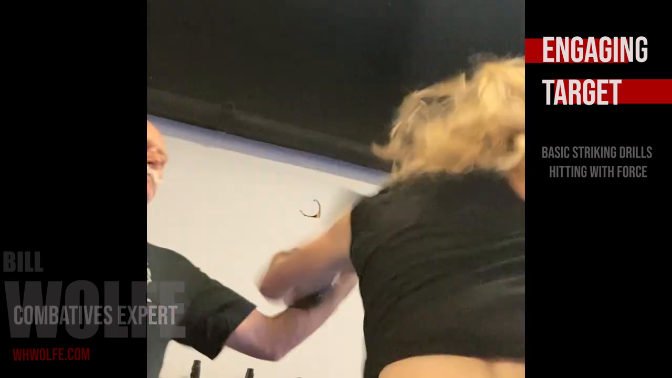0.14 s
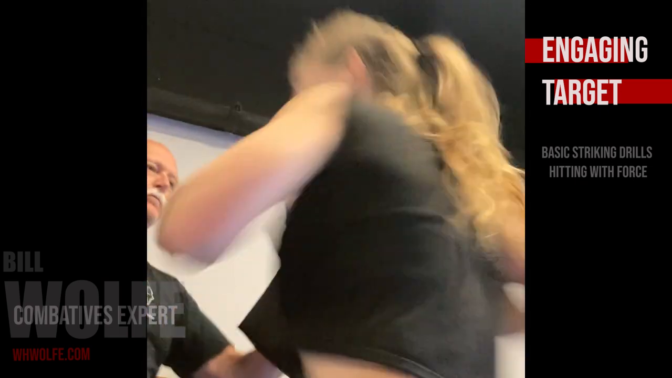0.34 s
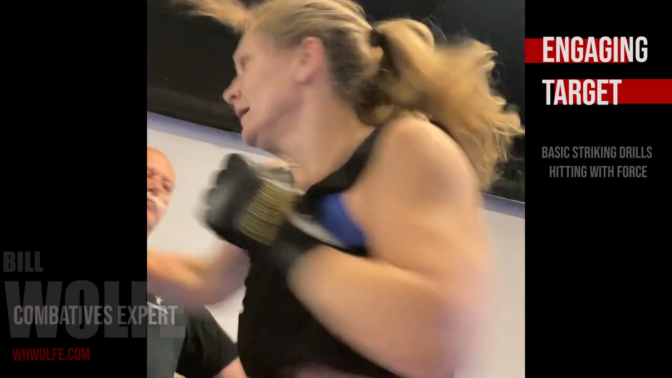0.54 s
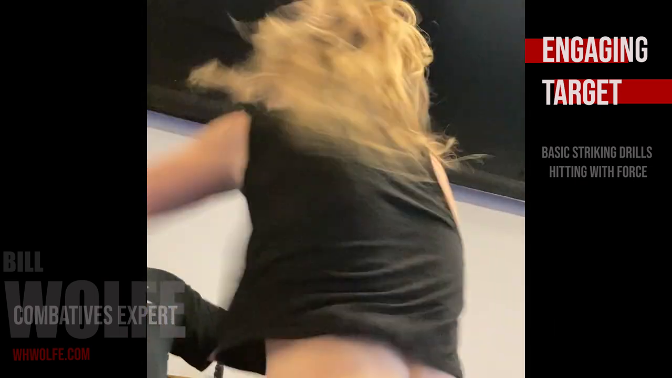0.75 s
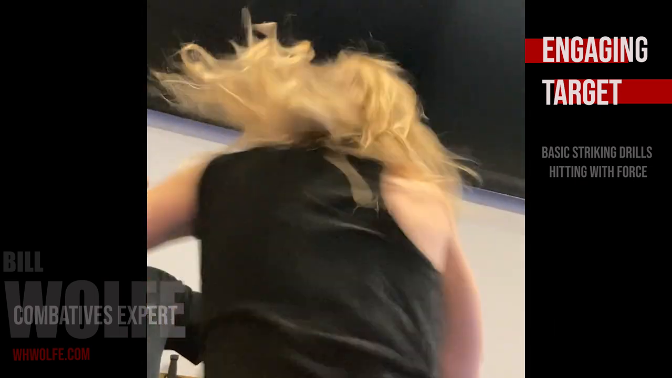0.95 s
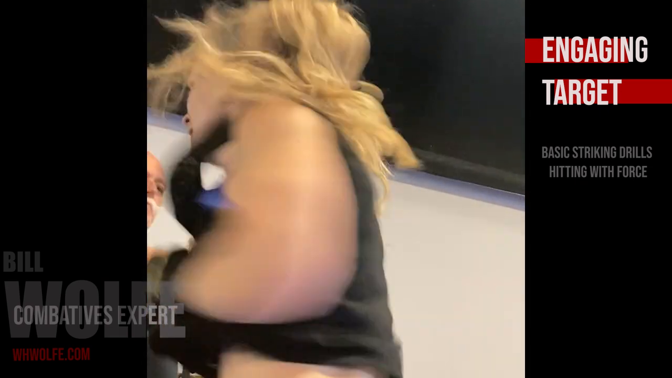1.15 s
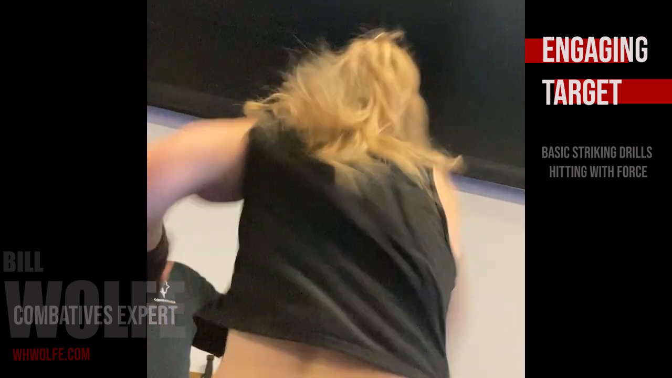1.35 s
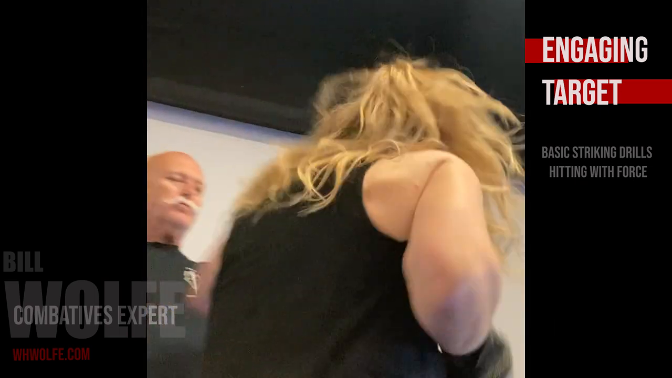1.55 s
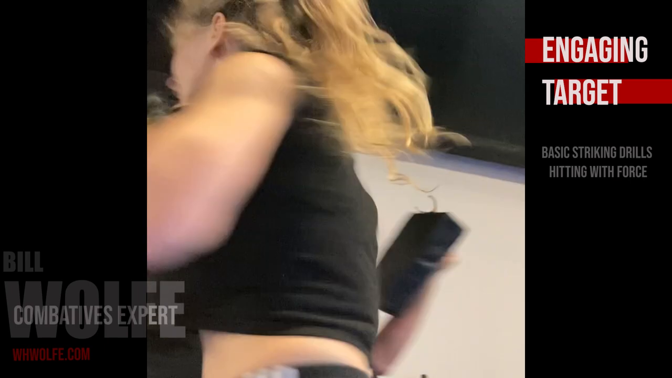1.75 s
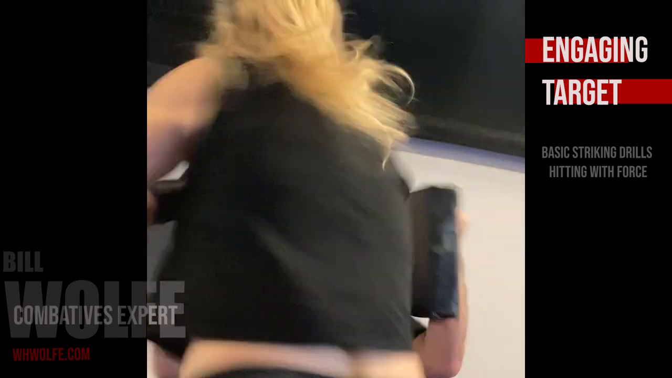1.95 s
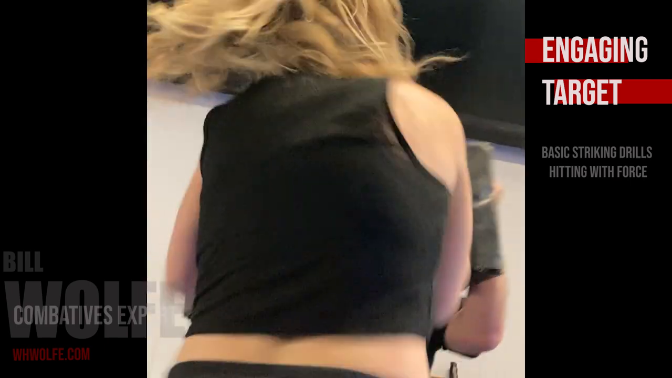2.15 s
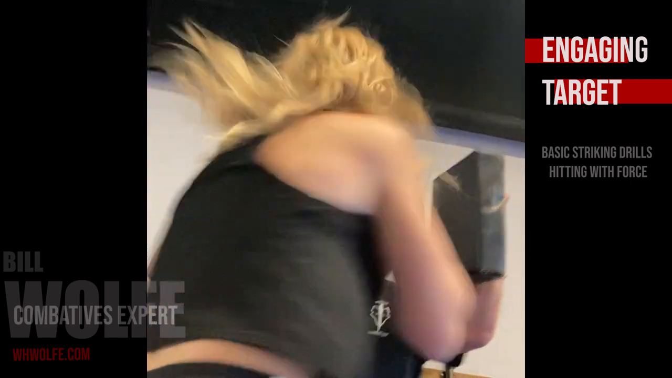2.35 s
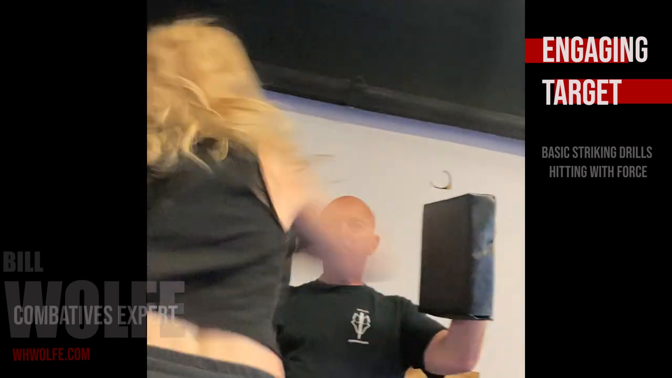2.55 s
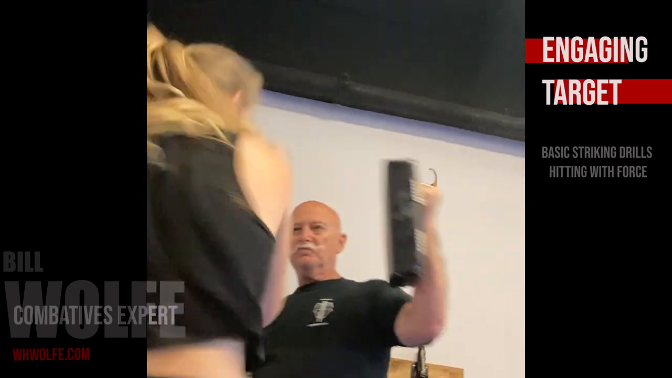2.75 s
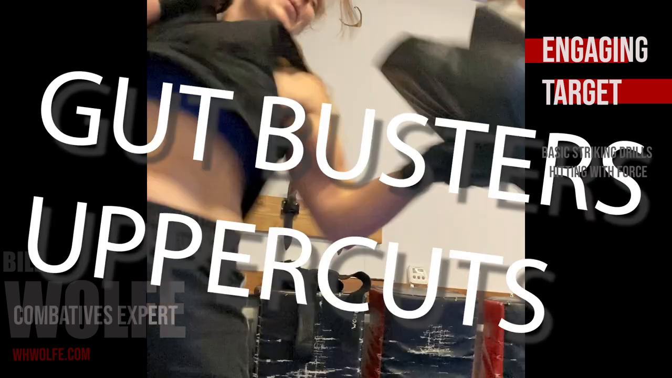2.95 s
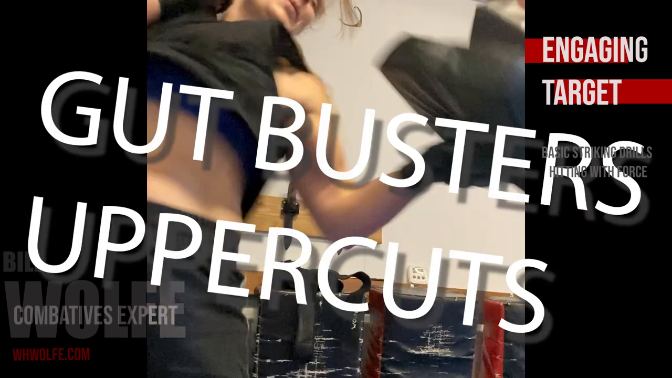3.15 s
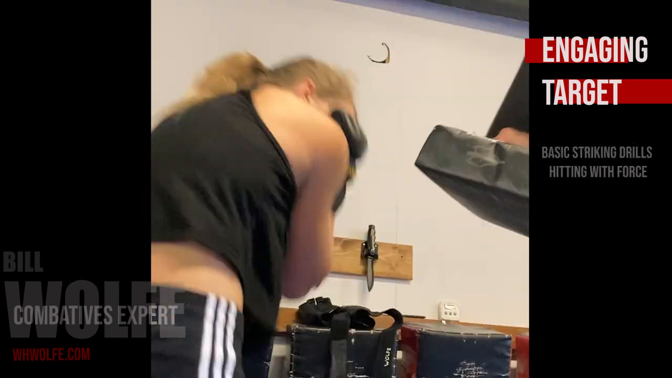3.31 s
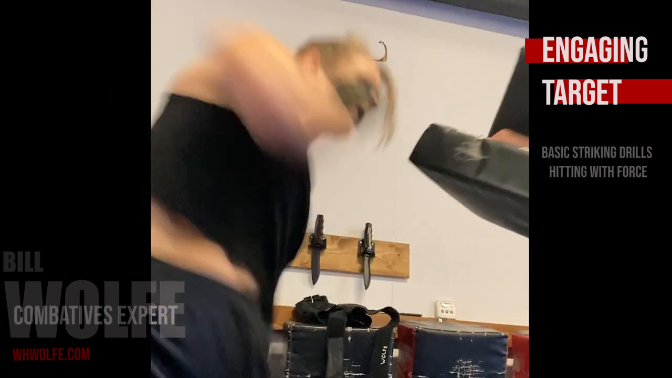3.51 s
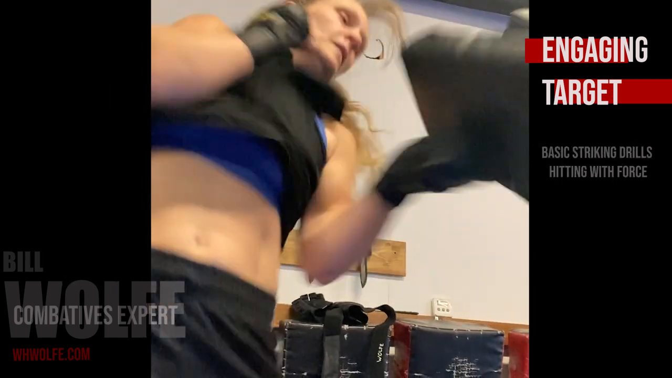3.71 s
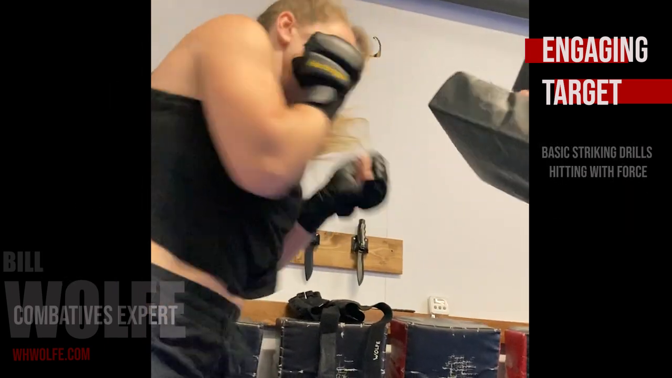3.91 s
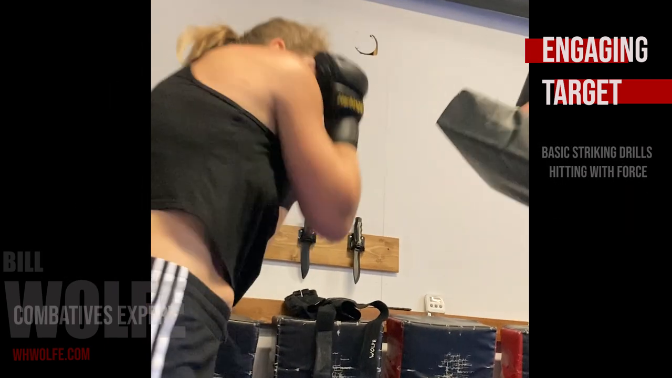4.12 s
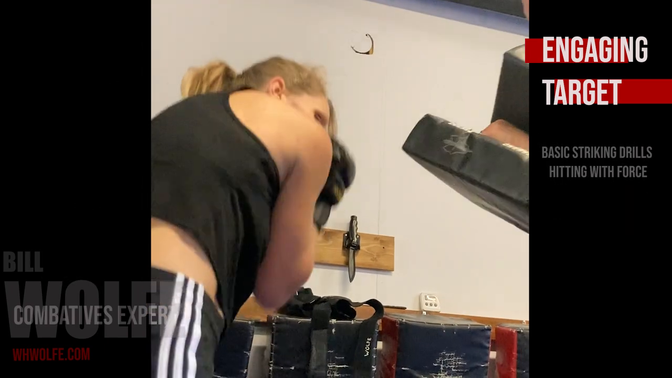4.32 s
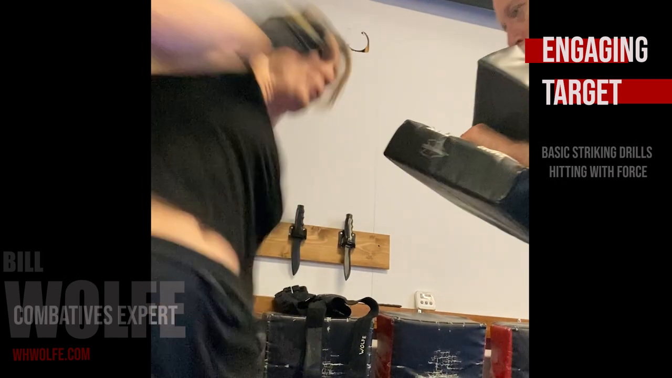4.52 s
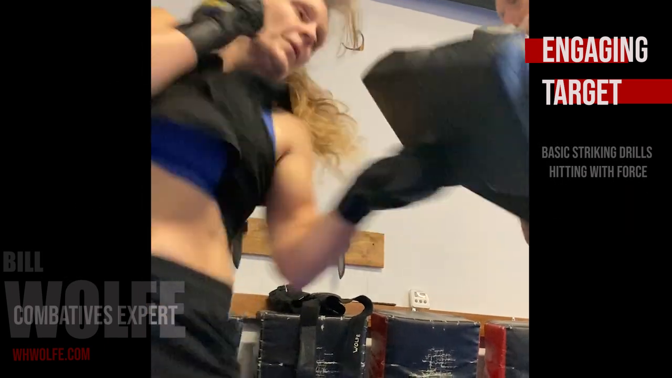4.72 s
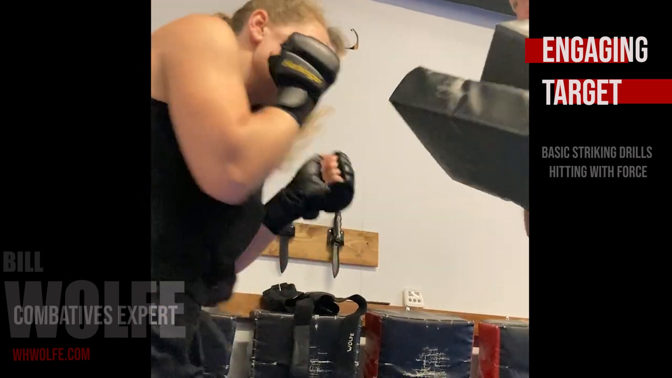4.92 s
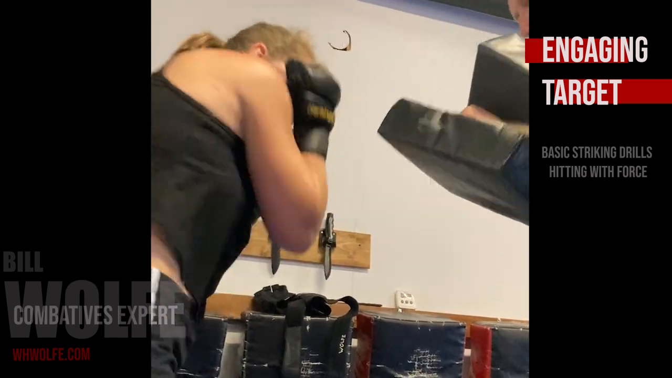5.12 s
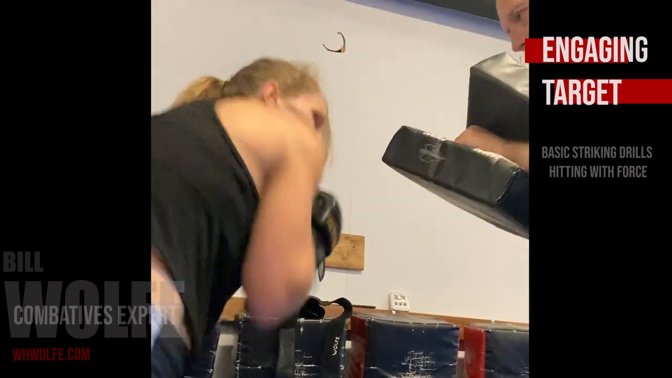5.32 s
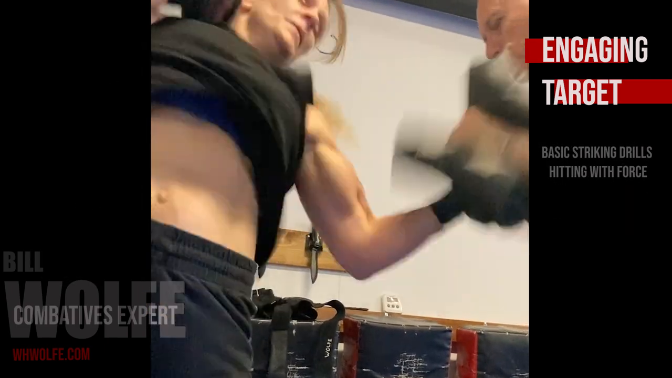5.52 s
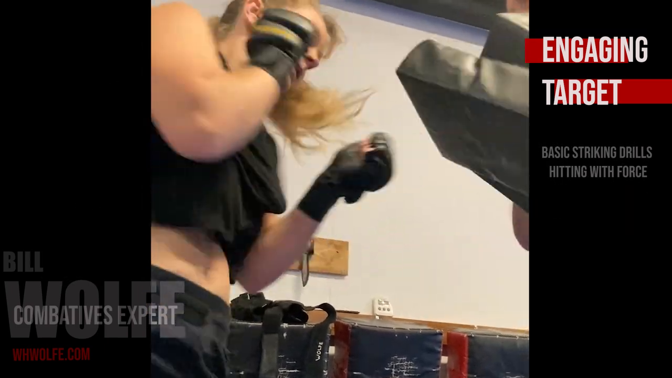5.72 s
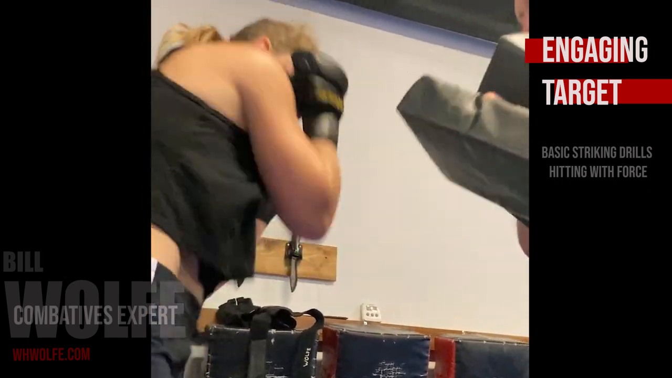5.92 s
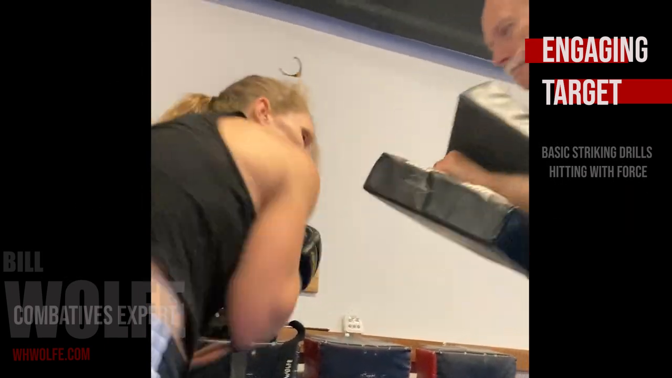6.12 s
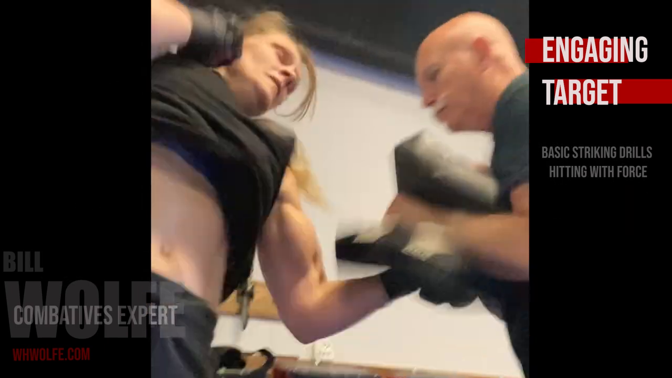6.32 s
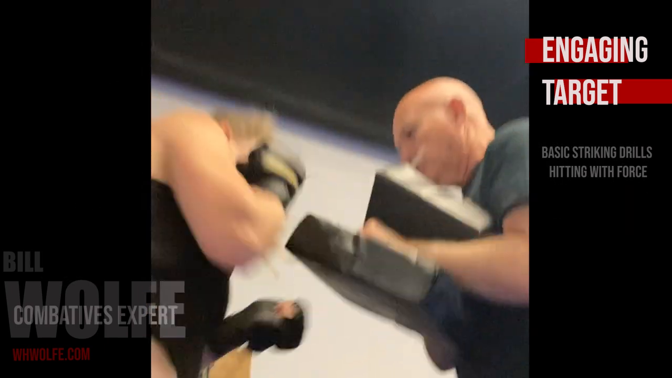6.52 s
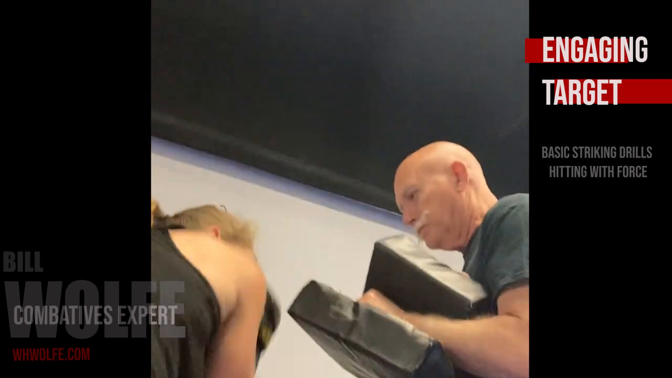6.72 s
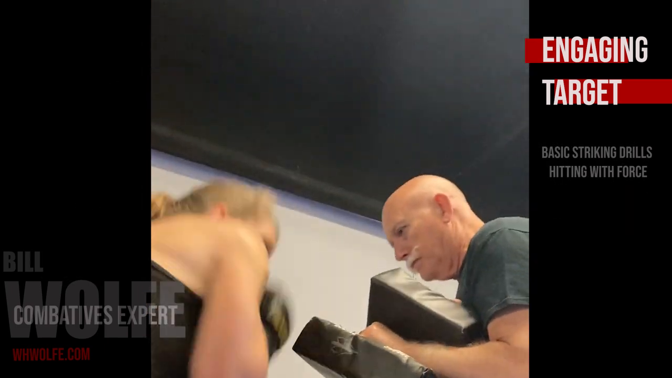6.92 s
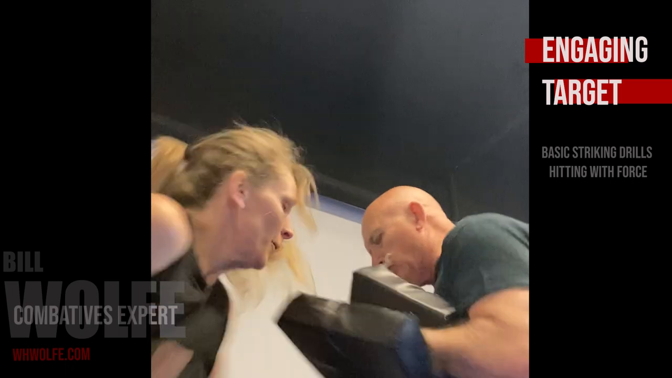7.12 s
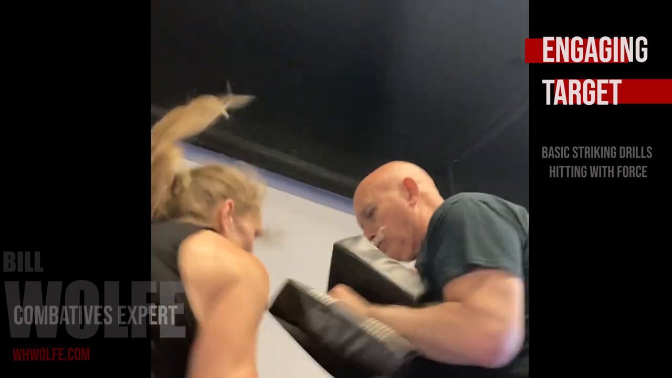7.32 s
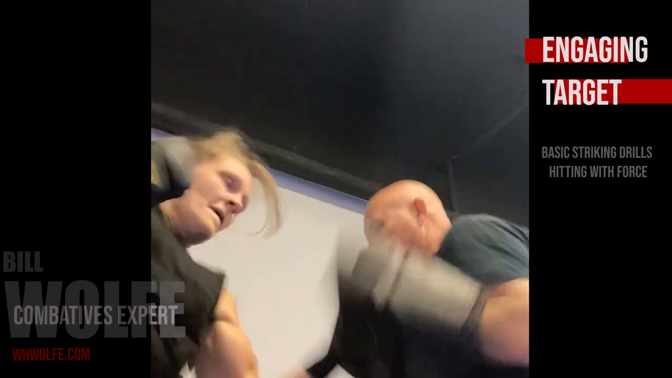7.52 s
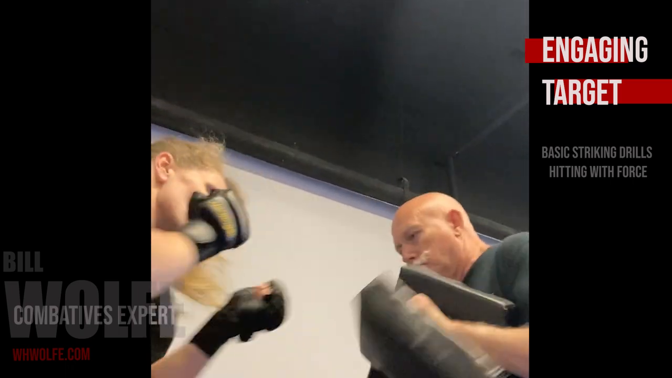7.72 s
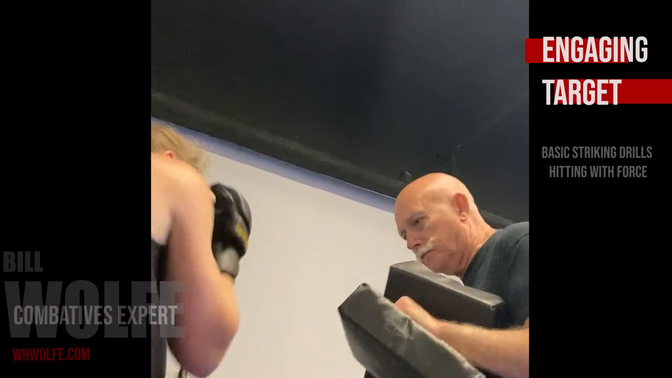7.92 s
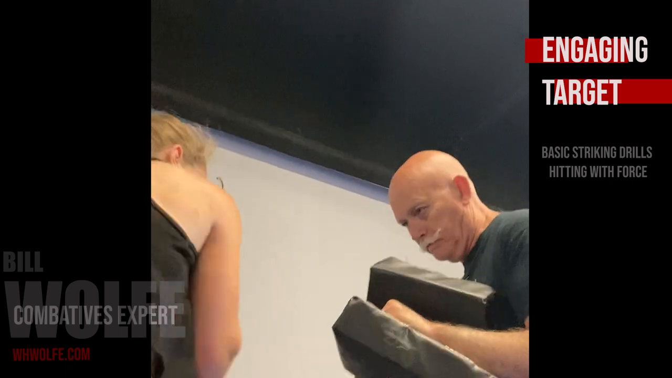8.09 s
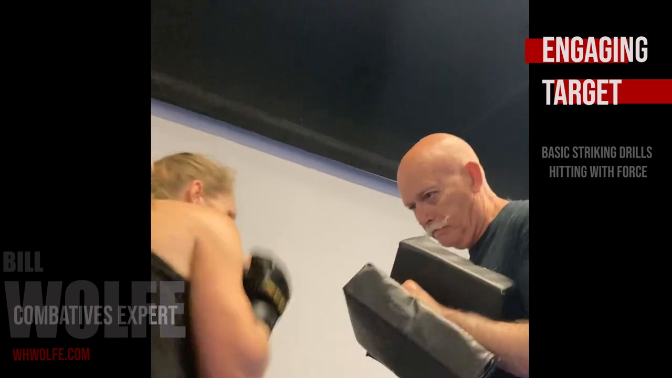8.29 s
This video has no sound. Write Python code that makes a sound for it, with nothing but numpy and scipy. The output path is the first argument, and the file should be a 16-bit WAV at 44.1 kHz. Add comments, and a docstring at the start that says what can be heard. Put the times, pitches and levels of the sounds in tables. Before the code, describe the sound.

A close stereo pickup in a reverberant gym with a faint low room murmur. At 0 s the ring of a punch just landed is still decaying; a light tap follows, then a small sharp smack at 0.1. From 0.45 to 2.6 s gloved fists pound handheld vinyl pads roughly every quarter to third of a second: noisy slap, falling hollow pop, short foam thump. Hits near 0.45, 1.1 and 1.75 are strongest; others are duller. Soft foot taps and hissing clothing fill gaps. At about 2.9 the sound cuts dead until 3.37, when quiet room tone returns. Heavy, crackling single uppercuts land at 3.6, 4.6, 5.5 and 6.3, with cloth swishes and tiny taps between. A quicker group hits at 7.05, a softer 7.25 and a strong 7.5. The hall ring fades over about a second, leaving faint rustle and tiny taps near 8.2.

```python
"""The ring of a punch just landed opens the scene; a light tap follows, then a fast flurry of gloved punches
into handheld vinyl pads in a gym, a brief silence, and single uppercuts.
Each punch sums a noisy vinyl slap, gliding pops of air trapped under the glove, and a low thump of the foam.
Taps are short noise bursts and clothes a swelling hiss; decaying noise makes the hall ring for about a second."""
import sys
import numpy as np
from scipy import signal
from scipy.fft import rfft, irfft, next_fast_len
from scipy.io import wavfile
from scipy.ndimage import uniform_filter1d

SR = 44100
rng = np.random.default_rng(int(sys.argv[2]) if len(sys.argv) > 2 else 0)


def unload_audio(sound):
    """Save the sound as a 16-bit wav file, at the path given as the first command line argument."""
    columns = np.transpose(np.atleast_2d(sound))
    # keep every value between -1 and 1, then stretch to whole-number steps
    steps = np.round(np.clip(columns, -1, 1) * 32767)
    wavfile.write(sys.argv[1], SR, steps.astype(np.int16))


N = 368235

# Levels of events are relative: each function trims them by a constant.
# Punches, the first before the start so that only its ring is heard: touch_s, full_contact_s (after touch),
# pop_pitch_hz, pop_half_length_s, pop_db, thump_db, slap_db, crackle_db, slap_length_s, smack_pitch_hz, smack_db
PUNCH_EVENTS = [(-.2, .006, 324, .005, -2.5, -11.5, -26.5, -30.5, 0.016, 1500, -18),
                (0.1249, 0.0019, 800, 0.001, -3, -20.5, -28.5, -37, 0.0037, 960, -14),
                (.453, .0055, 306, 0.003, 0, -14.5, -28, -34.5, 0.011, 1620, -22),
                (.7014, .0077, 298, 0.0057, -15, -22, -31.5, -35.5, 0.028, 1870, -23),
                (0.9673, .006, 370, 0.0072, -16.5, -24, -47.5, -44, 0.0051, 1770, -17.5),
                (1.122, 0.0065, 438, 0.0029, -1, -15.5, -25.5, -35.5, 0.0091, 1070, -10.5),
                (1.4419, .005, 347, 0.0058, -6.5, -18.5, -33.5, -44.5, 0.041, 1880, -22),
                (1.759, .0054, 372, .0015, 1, -12, -28.5, -34.5, 0.012, 2340, -11),
                (2.0267, .0097, 306, .0044, -9, -20, -37.5, -49, 0.04, 1950, -24),
                (2.339, .0099, 306, 0.0061, -13.5, -21, -39.5, -49.5, 0.021, 1720, -28),
                (2.5645, .006, 288, .0047, -6.5, -13, -33.5, -37, 0.023, 1700, -18),
                (3.6199, 0.00725, 284, .003, -2.5, -10.5, -29.5, -31, 0.0097, 1218, -11),
                (4.6117, 0.00862, 366, 0.0083, -4, -9, -27, -31.5, 0.014, 2070, -9),
                (5.514, 0.00792, 373, 0.0098, -5.5, -10, -25.5, -31.5, 0.0082, 910, -5),
                (6.322, 0.0071, 320, .0053, -2.5, -11.5, -27.5, -31.5, 0.01, 790, -5.5),
                (7.064, 0.00548, 466, 0.0036, -4, -14, -27.5, -39, 0.0075, 1750, -6.5),
                (7.251, 0.00516, 427, 0.0061, -6.5, -18, -35.5, -36, 0.0098, 850, -21),
                (7.5008, 0.00867, 375, 0.0038, -2, -13, -29, -31.5, 0.0071, 1540, -10)]
# Light steps and glove touches: start_s, thud_db, tick_db, tick_length_s, tick_pitch_hz
TAP_EVENTS = [(0.0617, -32, -28, 0.013, 4300), (0.2485, -22, -33, 0.0082, 4650),
              (.697, -19, -29.5, 0.0061, 1886), (0.91, -24.5, -49, 0.0079, 1500),
              (1.008, -25.5, -42.5, .006, 1610), (2.082, -19, -30, 0.012, 4900),
              (2.126, -20, -25.5, 0.0042, 2330), (3.386, -45.5, -51.5, 0.0026, 800),
              (4.315, -31.5, -43, 0.0034, 2950), (5.224, -30.5, -28.5, 0.0017, 2725),
              (5.287, -36, -54, 0.0091, 500), (6.057, -25, -32.5, 0.0043, 4160),
              (6.761, -26, -39, 0.0082, 2170), (7.243, -27, -25.5, 0.0054, 2880),
              (8.194, -34.5, -40.5, 0.0051, 2560), (8.227, -46, -44, .002, 6950)]
# Turns of the body: fastest_s, half_length_s, level_db
BODY_TURNS = [(1.71, 0.045, -43), (2.11, .03, -37), (2.29, .015, -40), (2.44, 0.085, -39.5),
              (2.86, .03, -43), (4.155, .025, -40), (4.52, 0.1, -35), (5.16, .05, -51.5),
              (6.09, 0.048, -40.5), (6.95, 0.085, -35), (7.18, 0.065, -34), (7.7, .04, -40.5),
              (8.04, 0.027, -54)]
# Clothes dragged by each punch, in swing and recoil: offset_s (from touch), half_length_s, level_db (against thump)
ARM_MOVES = [(-.02, 0.044, -36.5), (0.137, .15, -35.5)]

# Spectrum of the vinyl slap: frequency_hz, relative_level_db
SLAP_SPECTRUM = [(200, -9), (550, 8), (800, -3), (1150, -1.5), (1600, 3.5), (2600, -4), (4000, -6),
                 (6000, -7.5), (10000, -20), (16000, -38)]
# Spectrum of the creasing skin: frequency_hz, relative_level_db
CRACKLE_SPECTRUM = [(1500, -7), (4000, 5), (6000, 5.5), (8500, 5), (11000, -2.5), (15000, -2),
                    (17000, -9.5)]
# Spectrum of knocks into the padding: frequency_hz, relative_level_db
KNOCK_SPECTRUM = [(60, -36), (170, -3), (270, 0.5), (480, 1), (620, -5), (780, -3), (1200, -13),
                  (3000, -45.5), (8000, -67)]
# Spectrum of a tap's dull thud: frequency_hz, relative_level_db
THUD_SPECTRUM = [(50, 0.5), (120, -3), (200, -2), (310, 1), (500, -9), (900, -36), (3000, -27), (8000, -62)]
# Spectrum of sliding fabric: frequency_hz, relative_level_db
CLOTH_SPECTRUM = [(100, -33.5), (500, -3.5), (1700, -3.5), (3200, -4), (5500, -3.5), (8500, -3),
                  (11000, -13), (15000, -7)]
# Spectrum of the room's murmur: frequency_hz, relative_level_db
AIR_SPECTRUM = [(15, -30.5), (25, -14), (92, -0.5), (373, -13), (545, -16), (734, -14), (1290, -24.5),
                (1650, -17.5), (2410, -26.5), (9570, -33.5), (11900, -42.5), (16000, -33.5)]

# Echoes off floor, bodies and near walls: delay_s (before random variation), level_db
EARLY_ECHOES = [(.0062, -20), (.0095, -16), (0.0172, -22.5), (0.033, -36), (.044, -27.5)]
# Hall reverberation: frequency_hz, energy_db (against the direct sound), t60_s
HALL_BANDS = [(41.2, -7.5, 0.25), (62.5, 4.5, .6), (83.5, 2, 0.49), (121, -3.5, 0.72), (170, -1.5, 0.97),
              (338, -9, 0.59), (560, -3.5, 0.77), (1000, -0.5, 1.25), (2125, -2.5, 1.55),
              (4240, -4.5, 1.08), (8750, -9, 0.66), (15000, -5.5, 0.18)]
# Share of the hall's sound common to both ports: frequency_hz, share (0-1)
SHARED_POWER = [(60, 0.98), (250, 1), (550, 0.88), (1100, 0.73), (2500, 0.2), (4500, 0.7), (8000, 0.8)]
# Microphone response, with a dip near 12 kHz: frequency_hz, level_db
MIC_RESPONSE = [(20, -1), (50, 0.5), (10000, 1), (11100, -6.5), (11900, -37), (12900, -3), (14000, -0.5),
                (15700, -4), (16300, -3.5)]

LEAD = 0.03  # s of rushing air rendered before the touch
POP_GLIDE = 1.65  # exponent: steepness of the pop's fall in pitch
# a heavier blow crackles brighter: treble gain at a medium thump (dB), and its rise per dB of thump
MEDIUM_THUMP_DB, TREBLE_DB, TREBLE_PER_DB = -14, 4, 0.74
RUSTLE_DB = -63.5  # the clothes are never quite still; relative, like the moves
AIR_DB = -51  # rms over both ports, before the microphone
EDGE_HZ = 16600  # upper band limit


def amp(db):
    """Logarithmic level: 20 dB is a tenfold amplitude."""
    return 10 ** (np.asarray(db) / 20)


def evened(x):
    """Normalisation of mean power: scales to rms 1."""
    return x / np.sqrt(np.mean(x ** 2) + 1e-20)


def read(points, hz):
    """Interpolation on a logarithmic frequency axis."""
    f, value = np.transpose(points)
    return np.interp(np.log(hz + 1), np.log(f + 1), value)


def colour(x, points):
    """Linear filtering: multiplies the spectrum by a gain curve in dB."""
    size = next_fast_len(x.shape[-1])
    gain = amp(read(points, np.fft.rfftfreq(size, 1 / SR)))
    return irfft(rfft(x, size) * gain, size)[..., :x.shape[-1]]


def add(mix, s, sound):
    """Superposition: adds a sound to the mix at time s."""
    part = mix[:, max(round(s * SR), 0):][:, :sound.shape[-1]]
    part += sound[..., :part.shape[-1]]


def grains(size, spectrum, spread_db):
    """Granular contact noise: many tiny snaps of unequal size, filtered, at rms 1."""
    snap_db = spread_db * np.minimum(rng.exponential(1, size), 4)
    snaps = rng.standard_normal(size) * amp(snap_db)
    return evened(colour(snaps, spectrum))


def dive(t, peak, hz, glide):
    """Integrated frequency: phase of a sinking note that passes hz, at phase zero, at the peak time."""
    turns = np.cumsum(hz * (2 / (1 + t / peak)) ** glide) / SR
    return 2 * np.pi * (turns - np.interp(peak, t, turns))


def swell(t, peak, sharp):
    """Impulsive loading: a smooth rise to 1 at the peak time and a slower fall."""
    return (t / peak * np.exp(1 - t / peak)) ** sharp


def punch(contact, hz, half, pop_db, thump_db, slap_db, crackle_db, length, smack_hz, smack_db):
    """Impact on a padded skin: air rushes out, vinyl smacks and crackles, trapped air pops, foam thumps."""
    clock = np.arange(SR // 7) / SR - LEAD  # zero at the touch
    t, size = np.maximum(clock, 0), len(clock)
    contact, half, length = np.maximum([contact, half, length], 1e-3)

    # the first small pocket of air is squeezed out in two or three cycles
    first = min(contact, 0.006) / 2
    burst = np.exp(-((clock - first) * smack_hz / 1.8) ** 2)
    smack = amp(smack_db - 3) * burst * np.sin(dive(t, first, smack_hz, glide=0.97))

    # the main pocket rings for a few cycles only, and falls as it is squeezed
    squeeze = np.exp(-((clock - contact) / half) ** 2) * (1 - np.exp(-(t / 0.0023) ** 2))
    pop = -amp(pop_db - 2.5) * squeeze * np.cos(dive(t, contact, hz, POP_GLIDE))

    bottom = contact + 0.01097
    steady_phase = 2 * np.pi * (49 * t + rng.random())  # adds 49 Hz to the sinking pitch
    foam = np.cos(dive(t, bottom, hz=41.7, glide=4.06) + steady_phase)
    thump = amp(thump_db - 0.5) * swell(t, bottom, sharp=3.2) * foam

    # knuckles, wrist and the holder's arm knock unevenly into the padding
    knock_noise = grains(size, KNOCK_SPECTRUM, spread_db=3.5)
    knocks = amp(pop_db - 13) * swell(t, contact + 0.0025, sharp=1.64) * knock_noise

    touch = np.exp(-(t / length) ** 1.09) * (1 - np.exp(-t / 0.0012))
    touch /= np.sqrt(np.sum(touch ** 2) / (0.027 * SR))  # equal energy: a shorter slap peaks higher
    rush = 0.55 * np.exp(np.minimum(clock, 0) / 0.0054) * (clock < contact)
    spread = 0.46 * swell(t, contact + 0.005, sharp=2.2)  # the rest of the glove follows the knuckles
    slap = amp(slap_db + 3) * (touch + rush + spread) * grains(size, SLAP_SPECTRUM, spread_db=5.5)

    # the skin creases in clumps, about a millisecond each
    drift = evened(uniform_filter1d(rng.standard_normal(size), size=60))
    clumps = evened(amp(5.56 * drift))
    treble_db = TREBLE_DB + TREBLE_PER_DB * (thump_db - MEDIUM_THUMP_DB)
    creases = grains(size, CRACKLE_SPECTRUM, spread_db=1)
    creases = evened(colour(creases, [(10000, 0), (13000, treble_db)]))
    crackle = amp(crackle_db + 10) * touch * clumps * creases
    return smack + pop + thump + knocks + slap + crackle


def nearby(sound):
    """Early reflection: delayed copies, shifting from blow to blow as the two people move."""
    out = np.pad(sound, (0, SR // 10))[None]
    for delay, db in EARLY_ECHOES:
        add(out, delay * rng.uniform(0.8, 1.2), amp(db) * sound)
    return out


def hall(x, build=0.005):
    """Diffuse reverberation: a scatter of echoes, each band decaying exponentially at its own rate."""
    size = SR * 5 // 4
    drift = evened(uniform_filter1d(rng.standard_normal(size), size=130))
    bunches = evened(amp(2.93 * drift))  # echoes arrive in bunches
    bands = np.array(HALL_BANDS)
    noise = bunches * colour(rng.standard_normal((3, size)), bands[:, :2])
    hz, t, z = signal.stft(noise, SR, nperseg=512)
    shared = np.clip(read(SHARED_POWER, hz), 0, 1)[:, None]
    t60 = read(bands[:, ::2], hz)[:, None]
    z = np.sqrt(shared) * z[0] + np.sqrt(1 - shared) * z[1:]
    unit_energy = np.sqrt(2 * np.log(1000) / (t60 * SR))  # offsets the length of the decay
    z = z * amp(-60 * t / t60) * unit_energy
    response = signal.istft(z, SR, nperseg=512)[1][:, :size]
    response *= 1 - np.exp(-(np.arange(size) / SR / build) ** 2)
    return signal.fftconvolve(x[None], response, axes=1)[:, :len(x)]


def clothes():
    """Sliding friction: a fine hiss of many small slips, its power swelling with each movement."""
    moves = list(BODY_TURNS)
    for row in PUNCH_EVENTS:
        start, thump_db = row[0], row[5]
        moves += [(start + offset, half, thump_db + db) for offset, half, db in ARM_MOVES]
    t = np.arange(N) / SR
    power = amp(RUSTLE_DB) ** 2
    for s, half, db in moves:
        bump = np.exp(-np.minimum(((t - s) / half) ** 2, 20))
        power = power + (amp(db) * bump) ** 2
    return amp(-4) * np.sqrt(power) * grains(N, CLOTH_SPECTRUM, spread_db=2.5)


def room_air():
    """Partly coherent noise: a steady murmur, mostly common to both ports."""
    common, left, right = colour(rng.standard_normal((3, N)), AIR_SPECTRUM)
    return amp(AIR_DB) * evened(common + 0.47 * np.array([left, right]))


def tap(thud_db, tick_db, length, tick_hz):
    """Light impact: a short tick with one broad resonance, and a dull thud."""
    t = np.arange(3072) / SR
    thud_noise = grains(len(t), THUD_SPECTRUM, spread_db=5)
    thud = amp(thud_db - 3.5) * swell(t, 0.0052, sharp=0.89) * thud_noise
    resonance = [(tick_hz / 2, -13), (tick_hz, 0), (tick_hz * 1.4, -10), (17000, -16)]
    decay = np.exp(-t / max(length, 1e-3))
    tick = amp(tick_db) * decay * grains(len(t), resonance, spread_db=3)
    return thud + tick


def drill(swish):
    """Radiation in one direction: all the action, led by one second so that the hall already rings."""
    mix = np.zeros((1, SR + N))
    add(mix, 1, swish)
    for s, *blow in PUNCH_EVENTS:
        add(mix, 1 + s - LEAD, nearby(punch(*blow)))
    for s, *touch in TAP_EVENTS:
        add(mix, 1 + s, nearby(tap(*touch)))
    return mix[0]


def scene(count=4):
    """Direct plus diffuse field: the hall is fed from several directions, each impact with its own fine grain."""
    swish = clothes()
    directions = [drill(swish) for _ in range(count)]
    tail = sum(hall(sound) for sound in directions) / np.sqrt(count)
    return (directions[0] + tail)[:, SR:] + room_air()


def record(dry):
    """Transduction by two close ports: arrival lag, soft overload, a muted half second and a band limit."""
    lag = 4  # samples: sound reaches the left port first
    pair = np.array([dry[0] * amp(0.06), np.roll(dry[1], lag)])
    ports = colour(pair, MIC_RESPONSE)
    overload = np.sqrt(np.sqrt(1 + np.square(np.square(ports / 0.95))))
    live = np.interp(np.arange(N) / SR, [2.87, 2.89, 3.365, 3.38], [1, 0, 0, 1])
    low_pass = signal.firwin(511, EDGE_HZ, window=("kaiser", 9), fs=SR)
    return signal.oaconvolve(ports / overload * live, low_pass[None], "same")


dry = scene()
out = record(dry)
unload_audio(out)
```